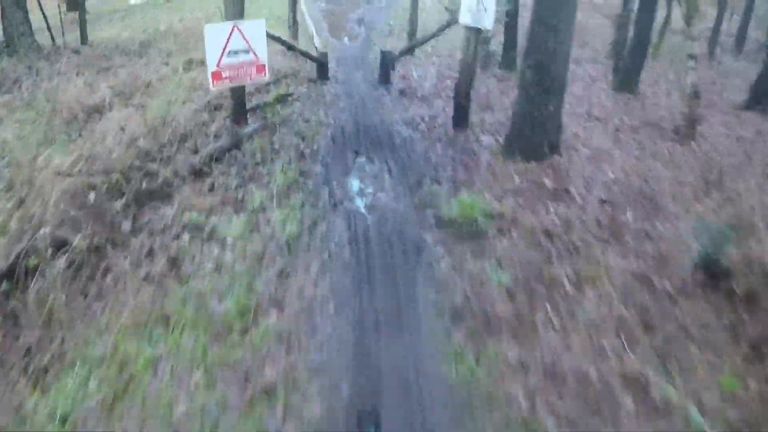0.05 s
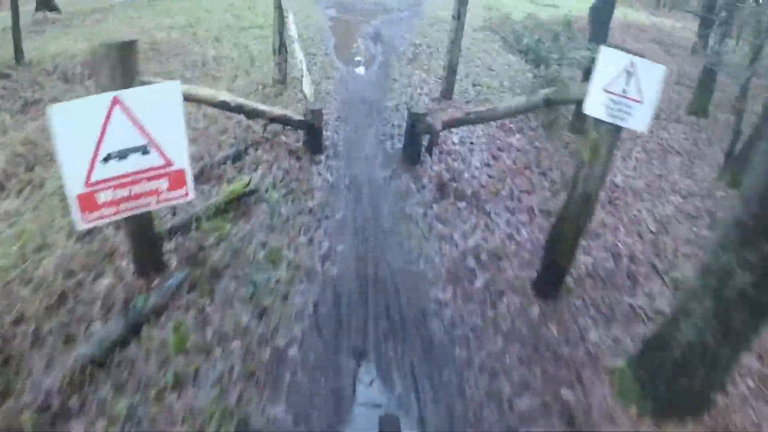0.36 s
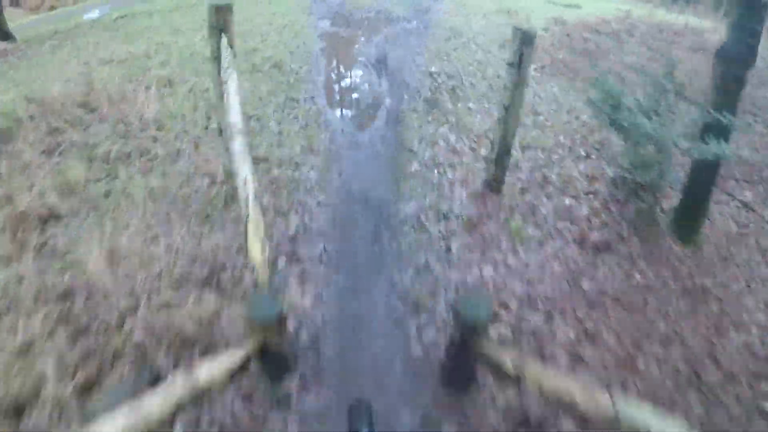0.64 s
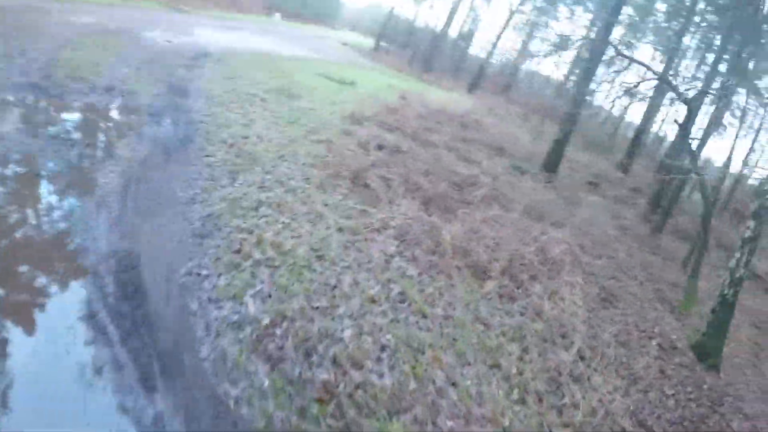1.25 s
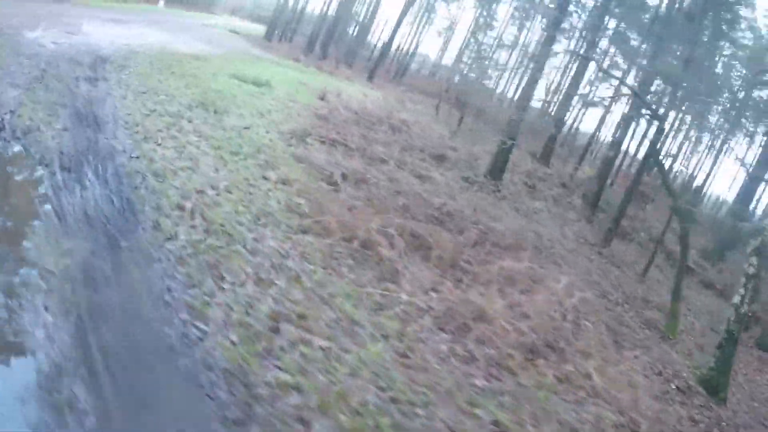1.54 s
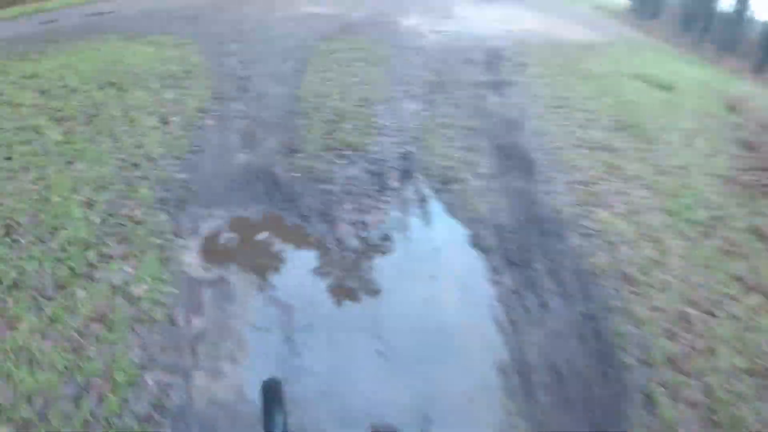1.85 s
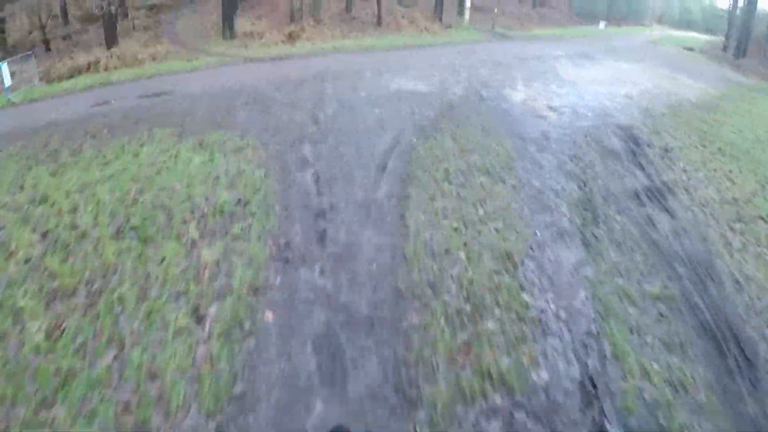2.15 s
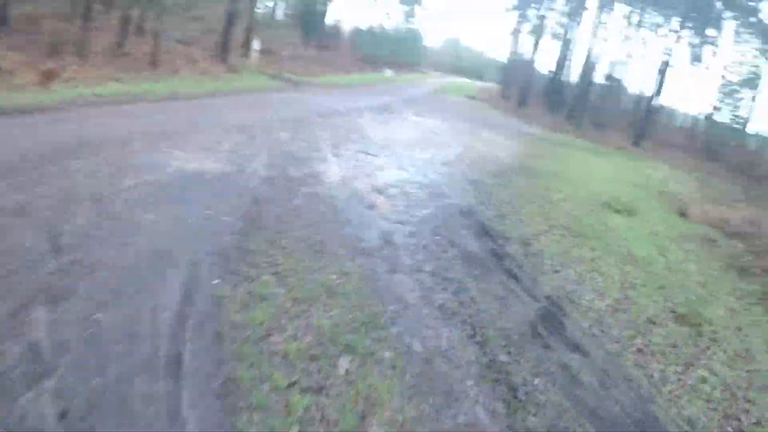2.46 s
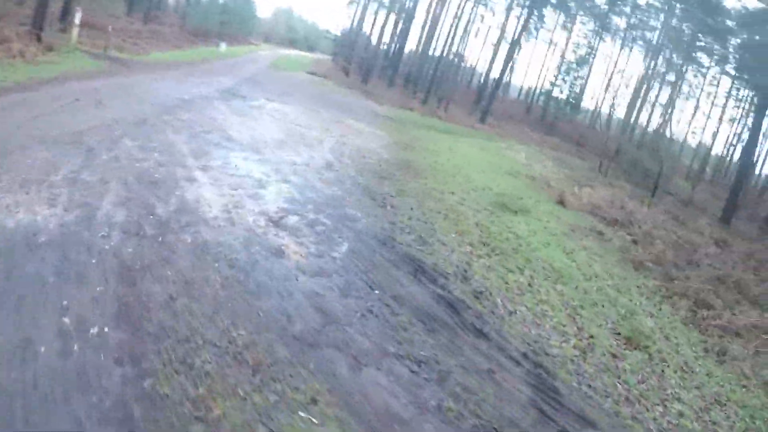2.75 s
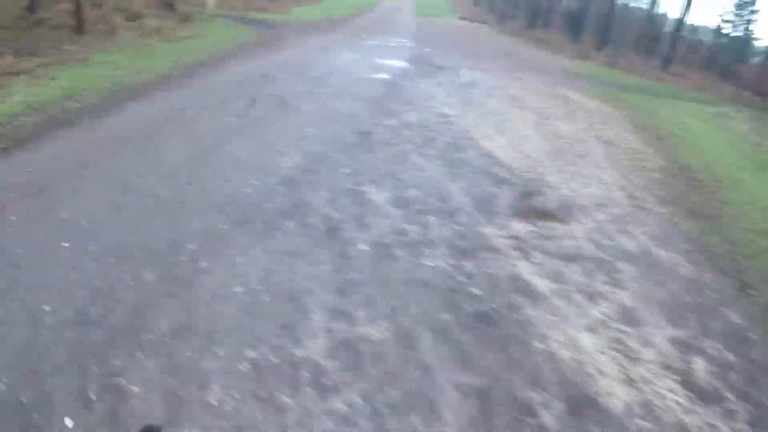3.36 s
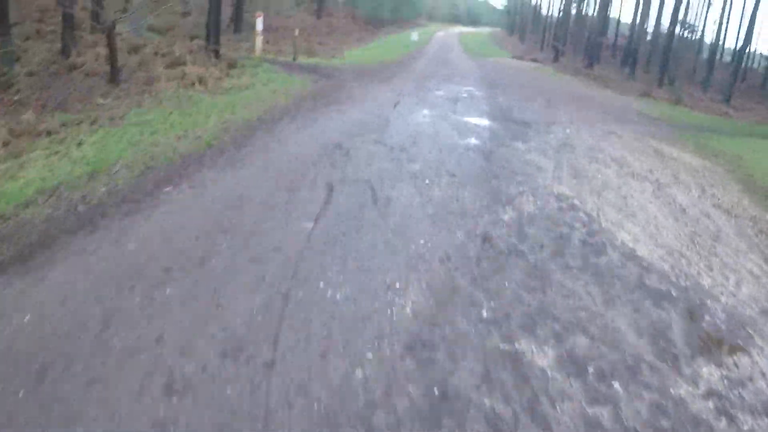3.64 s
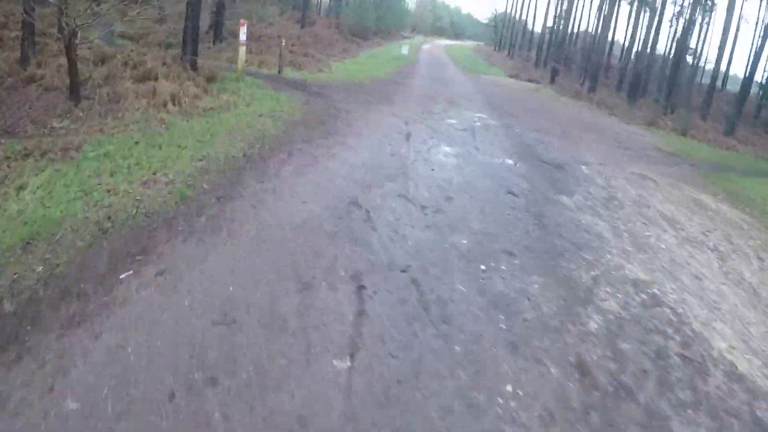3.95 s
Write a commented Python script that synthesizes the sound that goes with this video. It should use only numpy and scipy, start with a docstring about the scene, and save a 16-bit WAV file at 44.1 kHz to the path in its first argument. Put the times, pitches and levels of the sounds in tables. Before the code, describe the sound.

Gusty wind rumbles close on the microphone during a bike ride along a wet forest track. Quieter tyre sounds move from sticky mud hiss to puddle spray to damp gravel crunch, ending with three sharp stone ticks on the bike.

```python
"""A wet forest track, heard close up from a camera microphone on the rider of a rolling bicycle.
Wind buffets the microphone throughout and tears at it in the first second. Just below, the tyres hiss
as they peel off mud and leaves, fling spray through a puddle, hum briefly as the tread beats the water,
then crunch onto damp gravel, where three stones flick against the frame and make it ring."""
import sys
import numpy as np
from scipy.fft import rfft, irfft, next_fast_len
from scipy.io import wavfile
from scipy.ndimage import uniform_filter1d, map_coordinates

SR = 44100
rng = np.random.default_rng(int(sys.argv[2]) if len(sys.argv) > 2 else 0)


def to_wav(s):
    """Save 16-bit WAV."""
    ch = np.atleast_2d(s).T  # columns
    pcm = np.round(np.clip(ch, -1, 1) * 32767)  # PCM
    wavfile.write(sys.argv[1], SR, pcm.astype(np.int16))


N = 4 * SR
TIME = np.arange(N) / SR


def amp(db):
    """Decibels to gain."""
    return 10 ** (np.asarray(db) / 20)


def unit(x):
    """Scale to rms 1."""
    return x / np.sqrt(np.mean(x ** 2) + 1e-20)


def levels(rows, fade_s=0.022):
    """A gain curve for each dB column, fading out beyond the first and last row."""
    times, *columns = np.transpose(rows)
    outside_s = np.maximum(np.maximum(times[0] - TIME, TIME - times[-1]), 0)
    return [amp(np.interp(TIME, times, db)) * np.exp(-outside_s / fade_s) for db in columns]


def wobble(rate):
    """A smooth random curve, rate knots a second."""
    knots = rng.standard_normal(int(N * rate / SR) + 4)
    return map_coordinates(knots, [TIME * rate])


def decay(age, life):
    """An exponential fall, 60 dB down when age reaches life."""
    return np.exp(-np.log(1000) * age / life)


def swell(centre_s, length_s):
    """A smooth rise and fall."""
    return np.exp(-2 * ((TIME - centre_s) / length_s) ** 2)


def burst(start_s, attack_s, t60_s):
    """A quick rise that dies away."""
    age = np.maximum(TIME - start_s, 0)
    return (1 - np.exp(-age / attack_s)) * decay(age, t60_s)


def filtered(x, response):
    """x times a response of frequency."""
    size = next_fast_len(len(x) + 8192)
    return irfft(rfft(x, size) * response(np.fft.rfftfreq(size, 1 / SR)), size)[:len(x)]


def coloured(x, spectrum):
    """x shaped by (f/Hz, level/dB) points, at rms 1."""
    f, db = np.transpose(spectrum)
    return unit(filtered(x, lambda hz: amp(np.interp(np.log(hz + 1), np.log(f), db))))


def resonant_swells(source, rows, width_hz):
    """Brief swells of the source, each through a resonance of its own."""
    out = np.zeros(N)
    for start, db, length, hz in rows:
        band = filtered(source, lambda f: 1j * f * width_hz / (hz ** 2 - f ** 2 + 1j * f * width_hz))
        out += amp(db) * swell(start, length) * unit(band)
    return out


def turbulence(spectrum, flutter_rate, flutter_db, even_s):
    """Air noise that flutters quickly but keeps its strength over spans longer than even_s."""
    air = coloured(rng.standard_normal(N) * amp(flutter_db * wobble(flutter_rate)), spectrum)
    span = max(int(even_s * SR), 8)
    power = uniform_filter1d(uniform_filter1d(air ** 2, span), span)
    return air / np.sqrt(np.abs(power) + 1e-9)


def grains(rate, centre_hz, cycles, spread_db):
    """A shower of tiny rings of random pitch and size, each 60 dB down after the given cycles."""
    onset, pitch, strength, polarity = np.hsplit(rng.random((int(rate * N / SR), 4)), 4)
    hz = np.clip(centre_hz * (pitch / (1 - pitch)) ** (1 / 3), 400, 13000)
    size = amp(-spread_db * np.log(np.maximum(strength, .01))) * np.sign(polarity - .5)
    age_samples = np.arange(192)
    turns = hz * age_samples / SR
    rings = size * np.sin(2 * np.pi * turns) * decay(turns, cycles)
    positions = (onset * N).astype(int) + age_samples
    return unit(np.bincount(positions.ravel(), rings.ravel(), N)[:N])


def patter(shower, spectrum, hiss_db, clump_rate, clump_db):
    """Grains on a bed of hiss, coming in clumps as the tread bites."""
    mixed = shower + amp(hiss_db) * rng.standard_normal(N)
    return unit(coloured(mixed, spectrum) * amp(clump_db * wobble(clump_rate)))


# Low buffeting and the roar above it, right on the microphone: t/s, level/dB
BUFFET_LEVELS = [(0.0, -19), (0.49, -21), (0.7, -23.5), (0.77, -16), (0.81, -25.5), (0.91, -18),
                 (1.21, -27.5), (1.24, -20), (1.53, -29.5), (1.93, -20.5), (2.28, -20.5), (2.36, -30),
                 (2.43, -18), (2.49, -23.5), (2.61, -16.5), (2.72, -33.5), (3.01, -20), (3.36, -27.5),
                 (3.5, -41), (3.55, -29.5), (3.83, -25.5), (4.0, -31)]
ROAR_LEVELS = [(0, -22), (0.21, -13), (0.29, -21.5), (0.38, -15.5), (0.6, -18), (0.66, -23.5),
               (0.76, -20.5), (0.93, -21), (1.15, -31.5), (1.46, -31), (1.69, -26.5), (2.03, -26.5),
               (2.1, -25), (2.24, -21), (2.36, -31.5), (2.42, -26.5), (2.62, -27), (2.76, -30.5),
               (3.05, -27), (3.33, -33), (3.45, -39.5), (3.71, -31), (4, -39.5)]
# Eddies booming on the microphone: t/s, level/dB, length/s
EDDY_BOOMS = [(0.783, -30, 0.019), (0.93, -13.5, 0.023), (1.86, -16, 0.15), (2.877, -18.5, 0.061),
              (3.861, -23, 0.021)]
# Their spectra: f/Hz, level/dB
BUFFET_SPECTRUM = [(10, -23), (28, -5), (55, -0.5), (85, -1), (125, -11.5), (250, -67.5), (1000, -130)]
ROAR_SPECTRUM = [(50, -13.5), (90, -8), (125, -2), (190, -5), (280, -12.5), (420, -19), (700, -30),
                 (1500, -41), (8000, -120)]
EDDY_SPECTRUM = [(50, -22), (85, -5), (112, 6.5), (140, -1.5), (190, -16.5), (400, -55), (1500, -130)]


def wind():
    """Turbulent air buffets the microphone and roars past it; single eddies boom."""
    buffet = turbulence(BUFFET_SPECTRUM, flutter_rate=21, flutter_db=3, even_s=0.06)
    roar = turbulence(ROAR_SPECTRUM, flutter_rate=40, flutter_db=2, even_s=0.054)
    eddies = turbulence(EDDY_SPECTRUM, flutter_rate=25, flutter_db=8.5, even_s=0.011)
    booms = sum(amp(db) * swell(centre, length) for centre, db, length in EDDY_BOOMS)
    return levels(BUFFET_LEVELS)[0] * buffet + levels(ROAR_LEVELS)[0] * roar + booms * eddies


# The opening gust, full on the microphone: t/s, body level/dB, rasp level/dB
GUST_LEVELS = [(0.01, -13, -22), (0.1, -23.5, -28), (0.19, -21, -26.5), (0.28, -28, -32.5),
               (0.38, -25, -33), (0.45, -18, -29.5), (0.49, -26, -22), (0.535, -22, -28),
               (0.58, -16, -26.5), (0.67, -22, -26), (0.71, -21, -32), (0.8, -22.5, -33), (0.9, -31, -39.5),
               (1.02, -45, -41.5), (1.09, -48, -56)]
# Sharp puffs within it: t/s, level/dB, t60/s
GUST_PUFFS = [(0.18, -19.5, 0.06), (0.311, -14.5, 0.035), (0.472, -19, 0.13), (0.551, -13, 0.033),
              (0.644, -24, 0.045), (0.74, -5, 0.026), (0.769, -17, 0.058), (1.015, -22, 0.061)]
# Spectra of its body and rasp: f/Hz, level/dB
BODY_SPECTRUM = [(100, -9), (240, -3), (420, -2), (650, -8), (1000, -19.5), (2000, -39.5), (9000, -100)]
RASP_SPECTRUM = [(300, -16.5), (750, 2.5), (1050, -2), (1500, -7.5), (2300, -18), (4000, -33.5),
                 (14000, -90)]


def gust():
    """A strong gust tears raggedly at the microphone, with sharp puffs in its body and its rasp."""
    body_gain, rasp_gain = levels(GUST_LEVELS)
    puffs = sum(amp(db) * burst(start, attack_s=0.0013, t60_s=t60) for start, db, t60 in GUST_PUFFS)
    body = turbulence(BODY_SPECTRUM, flutter_rate=90, flutter_db=2.5, even_s=0.012)
    rasp = turbulence(RASP_SPECTRUM, flutter_rate=200, flutter_db=2.5, even_s=0.021)
    tearing = unit(amp(1.93 * wobble(220)))
    return ((body_gain + puffs) * body + (rasp_gain + amp(-9) * puffs) * rasp) * tearing


# Hollow swells of the gust at the microphone: t/s, level/dB, length/s, f/Hz
HOLLOW_SWELLS = [(0.484, -22, 0.014, 880), (0.67, -25, 0.039, 1090)]


def hollow_gust():
    """The gust briefly blows with a hollow tone."""
    rasp = coloured(rng.standard_normal(N), RASP_SPECTRUM)
    return resonant_swells(rasp, HOLLOW_SWELLS, width_hz=330)


# Tyres on wet mud and leaves below the microphone, steady hiss and single smacks: t/s, level/dB
MUD_LEVELS = [(0.02, -35.5), (0.122, -37.5), (0.182, -40), (0.3, -35.5), (0.395, -28), (0.48, -32.5),
              (0.512, -31.5), (0.674, -36.5), (0.73, -41.5), (0.954, -38), (1.1, -46)]
MUD_SMACKS = [(0.7475, -32), (1.002, -36)]
# Spectrum of both: f/Hz, level/dB
MUD_SPECTRUM = [(600, -4.5), (2000, -3), (3100, -7), (3900, 0), (5000, -2), (6400, -3.5), (8200, -20),
                (9600, -21.5), (12000, -37.5), (14500, -51)]


def mud():
    """The tread peels off wet mud and leaves with a sticky hiss and the odd sharp smack."""
    ticks = grains(rate=2500, centre_hz=4800, cycles=3.1, spread_db=4.5)
    hiss = patter(ticks, MUD_SPECTRUM, hiss_db=2, clump_rate=82, clump_db=0.9)
    smacks = sum(amp(db) * burst(start, attack_s=0.0005, t60_s=0.015) for start, db in MUD_SMACKS)
    return (levels(MUD_LEVELS)[0] + smacks) * hiss


# Spray off the track's wet edge, then the puddle's splash, close by: t/s, level/dB, mist level/dB
SPRAY_LEVELS = [(1.1, -46.5, -46.5), (1.185, -35, -42), (1.39, -32, -38.5), (1.68, -32.5, -41),
                (1.77, -35, -49), (1.87, -35.5, -52)]
SPLASH_LEVELS = [(1.71, -44, -49), (1.75, -38.5, -32.5), (1.8, -40.5, -38), (1.85, -38, -31),
                 (1.89, -37, -38.5), (1.96, -34, -33), (2.02, -35, -38.5), (2.1, -34, -35),
                 (2.15, -38, -41), (2.21, -40.5, -35.5), (2.28, -43, -42.5), (2.37, -43.5, -46.5),
                 (2.46, -49.5, -52)]
# Spectra of the spray, its mist, the splash and its fizzing mist: f/Hz, level/dB
SPRAY_SPECTRUM = [(400, -3.5), (800, -15.5), (1300, -9.5), (2000, -7.5), (2900, -4.5), (3600, -3),
                  (4400, -13), (6000, -31), (9000, -42), (14000, -85)]
MIST_SPECTRUM = [(2000, -24), (4000, 1.5), (5000, 0), (6500, -3.5), (7500, -7), (8500, -18), (10000, -20.5),
                 (12000, -35), (14500, -47)]
SPLASH_SPECTRUM = [(250, -3), (700, -11), (1300, -1), (2100, 2.5), (2900, 1), (4000, -5), (6000, -10),
                   (9000, -50), (14000, -83)]
FIZZ_SPECTRUM = [(2000, -8), (4200, -3.5), (5200, -4.5), (6500, -5), (8200, -20), (9800, -21), (12000, -34),
                 (14500, -37.5)]


def puddle():
    """The tyres fling a fine spray off the wet track, then heavier drops out of the puddle."""
    spray, mist = levels(SPRAY_LEVELS)
    splash, fizz = levels(SPLASH_LEVELS)
    drops = grains(rate=3000, centre_hz=2980, cycles=11.6, spread_db=2)
    big_drops = grains(rate=1600, centre_hz=1860, cycles=9.1, spread_db=2.5)
    droplets = grains(rate=5800, centre_hz=5430, cycles=4, spread_db=3)
    return (spray * patter(drops, SPRAY_SPECTRUM, hiss_db=4.5, clump_rate=110, clump_db=0.7)
            + mist * patter(droplets, MIST_SPECTRUM, hiss_db=7.5, clump_rate=51, clump_db=1.3)
            + splash * patter(big_drops, SPLASH_SPECTRUM, hiss_db=1.5, clump_rate=120, clump_db=2)
            + fizz * coloured(droplets, FIZZ_SPECTRUM))


# Tread in the puddle, heard from the saddle: t/s, knob rate f/Hz, level/dB
HUM_PATH = [(1.9, 204, -39), (2.0, 173, -39), (2.11, 210, -35.5), (2.22, 232, -38), (2.31, 177, -36.5),
            (2.335, 172, -50)]
# Overtones of the hum: multiple of the knob rate, relative level/dB
HUM_OVERTONES = [(2, -5.5), (3, -4.5), (4, -9.5)]


def tread_hum(pitch_jitter=0.08, flicker_db=3.6):
    """The knobs of the tread beat the water: a fuzzy hum that rises and falls."""
    times, hz, db = np.transpose(HUM_PATH)
    knob_hz = np.interp(TIME, times, hz)
    tone = np.zeros(N)
    for multiple, level in HUM_OVERTONES:
        gain = amp(level + flicker_db * wobble(50))
        turns = np.cumsum(knob_hz * (1 + pitch_jitter * wobble(260))) / SR
        tone += gain * np.sin(2 * np.pi * multiple * turns)
    return levels(np.column_stack([times, db]))[0] * unit(tone)


# Damp gravel just below the rider: t/s, crunch level/dB, grind level/dB, fizz level/dB
GRAVEL_LEVELS = [(2.48, -44.5, -58, -53.5), (2.65, -42.5, -53, -52.5), (2.84, -45.5, -51.5, -58),
                 (3.15, -43.5, -43, -58.5), (3.27, -41.5, -41.5, -58.5), (3.48, -44.5, -40.5, -57),
                 (3.62, -43, -36.5, -50), (3.76, -44, -40.5, -50.5), (3.92, -44.5, -39, -48.5),
                 (4, -46, -46, -50.5)]
# Short scrapes of the tread in the grit: t/s, level/dB, length/s, f/Hz
GRIT_SCRAPES = [(2.597, -42.5, 0.053, 2580), (2.956, -43.5, 0.015, 1820), (3.072, -43, 0.076, 1620)]
# Spectra of the crunch and the low grinding: f/Hz, level/dB
CRUNCH_SPECTRUM = [(600, -23), (1300, -5), (1900, 0), (2600, 0), (3400, -2.5), (4500, -10), (6500, -36),
                   (9000, -58)]
GRIND_SPECTRUM = [(150, -4.5), (450, -16.5), (850, -8), (1300, -5.5), (2000, -9), (4000, -50), (8000, -84)]


def gravel():
    """Damp grit grinds and crunches under the tread, with a thin wet fizz and narrow-band scrapes."""
    crunch, grind, fizz = levels(GRAVEL_LEVELS)
    grit = grains(rate=1800, centre_hz=2120, cycles=5.3, spread_db=2.5)
    pebbles = grains(rate=900, centre_hz=1034, cycles=2.7, spread_db=2)
    sand = grains(rate=3000, centre_hz=5500, cycles=4, spread_db=4)
    return (crunch * patter(grit, CRUNCH_SPECTRUM, hiss_db=3.5, clump_rate=82, clump_db=1.4)
            + grind * patter(pebbles, GRIND_SPECTRUM, hiss_db=6.5, clump_rate=97, clump_db=1)
            + fizz * patter(sand, FIZZ_SPECTRUM, hiss_db=4, clump_rate=50, clump_db=1.7)
            + resonant_swells(grit, GRIT_SCRAPES, width_hz=450))


# Stones hitting the frame, within reach of the microphone: t/s, level/dB, ring tilt/(dB per octave)
STONE_HITS = [(3.5596, -17, 2), (3.6621, -16, -1.5), (3.866, -25, -5)]
# Ringing modes of the frame: f/Hz, level/dB, t60/s
FRAME_RING = [(1400, -11, 0.025), (3140, -9, 0.017), (4520, -15, 0.014), (6130, -12.5, 0.019)]
# Spectrum of the crack on contact: f/Hz, level/dB
CRACK_SPECTRUM = [(300, 7), (1500, -1), (3000, 7), (4300, -2), (6400, -0.5), (8200, -16), (10000, -18.5),
                  (14000, -42)]


def stones(bounce_s=0.006, bounce_db=-12, crack_db=-8.5, crack_t60_s=0.033, attack_s=0.0005):
    """Each stone cracks against the frame and strikes again, with its own brighter or duller ring."""
    out = np.zeros(N + SR)
    age = np.arange(SR // 10) / SR
    attack = 1 - np.exp(-age / attack_s)
    middle_hz = np.mean([hz for hz, _, _ in FRAME_RING])
    for start, db, tilt in STONE_HITS:
        for delay, loss_db in [(0, 0), (bounce_s, bounce_db)]:
            ring = np.zeros(len(age))
            for hz, level, t60 in FRAME_RING:
                gain = amp(level + tilt * np.log2(hz / middle_hz) + rng.normal())
                ring += gain * decay(age, t60) * np.sin(2 * np.pi * hz * age)
            noise = coloured(rng.standard_normal(len(age)), CRACK_SPECTRUM)
            crack = amp(crack_db) * noise * decay(age, crack_t60_s)
            first = round((start + delay) * SR)
            out[first:first + len(age)] += amp(db + loss_db) * (ring + crack) * attack
    return out[:N]


def scene():
    """Wind, tyres and frame at one microphone riding with the bicycle, in mono."""
    return (wind() + gust() + mud() + puddle() + gravel() + tread_hum() + stones() + hollow_gust())[None]


def record(dry):
    """The camera keeps nothing above its band limit."""
    top_hz = 14400
    return np.array([filtered(channel, lambda hz: hz < top_hz) for channel in dry])


dry = scene()
out = record(dry)
to_wav(out)
```